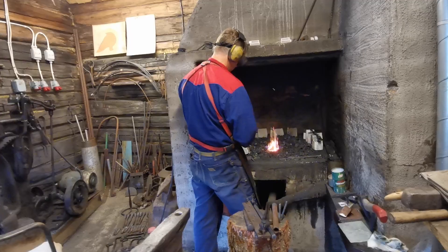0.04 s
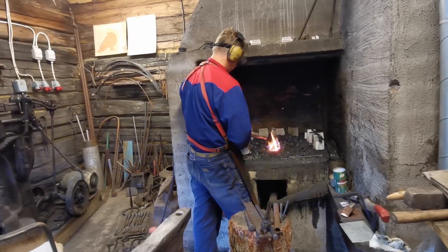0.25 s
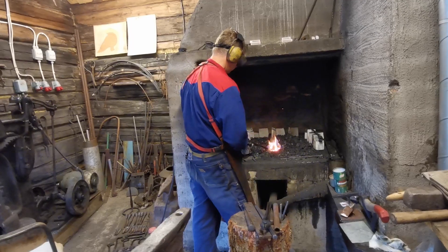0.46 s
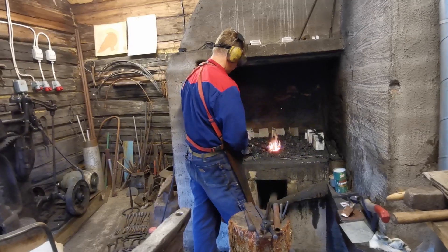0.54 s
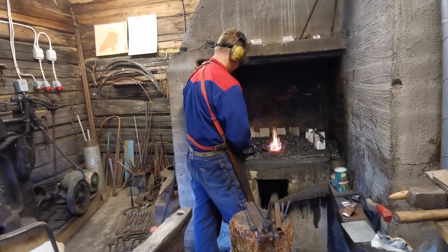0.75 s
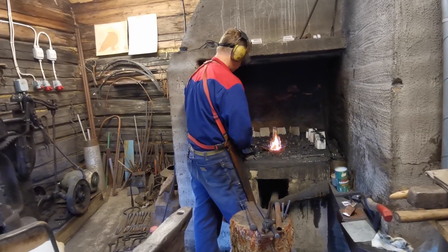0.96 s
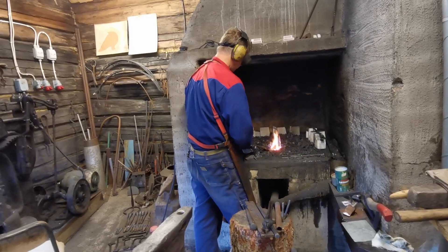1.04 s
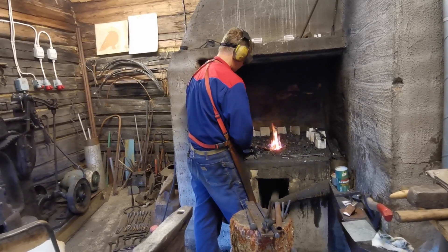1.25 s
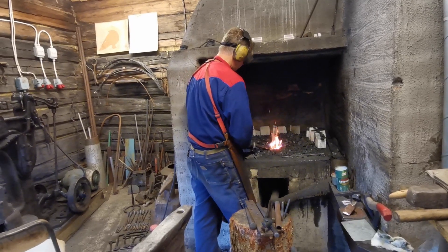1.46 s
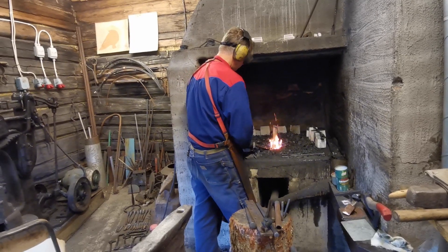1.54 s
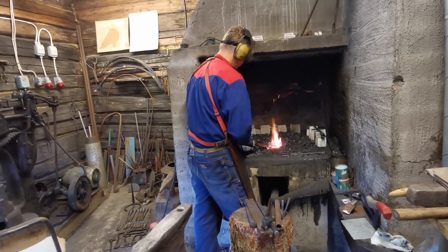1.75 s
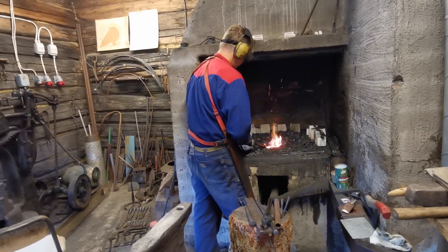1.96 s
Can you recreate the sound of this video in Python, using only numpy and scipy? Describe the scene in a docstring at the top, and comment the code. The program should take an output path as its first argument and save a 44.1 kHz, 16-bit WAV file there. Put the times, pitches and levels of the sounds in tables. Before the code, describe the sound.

An electric blower hums and roars low throughout beside a forge fire; from about 0.75 seconds a rod scrapes and ticks faintly in the coals, in a workshop, heard from a few metres in stereo.

```python
"""A blacksmith's forge, heard from a few metres by a two-port microphone. An electric blower whines on
motor lines, sines that waver slightly. Its air roars as noise through duct, fire pot and hood resonances,
under a broad flickering rush. The smith works an iron rod in the coals: grains of noise and short ticks
ring the rod and coals, over a rustle. Near the end a coal cracks once, a short bright noise burst."""
import sys
import numpy as np
from scipy import signal
from scipy.fft import rfft, irfft
from scipy.io import wavfile
from scipy.ndimage import uniform_filter1d

SR = 44100
rng = np.random.default_rng(int(sys.argv[2]) if len(sys.argv) > 2 else 0)


def natural_amplitude(level_db):
    """Convert a level in decibels to a linear amplitude factor, elementwise."""
    exponent = np.asarray(level_db, float) / 20
    return 10 ** exponent


def dump(signal):
    """Clip the signal to [-1, 1] and save it as 16-bit WAV at the path in sys.argv[1]."""
    limited = np.clip(np.atleast_2d(signal).T, -1, 1)
    pcm = np.round(limited * 32767).astype(np.int16)
    wavfile.write(sys.argv[1], SR, pcm)


N = 88200
T = np.arange(N) / SR
HZ = np.fft.rfftfreq(N, 1 / SR)
SHAFT_HZ = 47.4

# Draught through the fire. Each row: time in seconds, level in dB (only its swing about the mean is used).
DRAUGHT = [(0.0, -47.5), (0.11, -63.5), (0.33, -51.5), (0.38, -61.5), (0.43, -51), (0.67, -59),
           (0.69, -49.5), (0.76, -51), (0.8, -58.5), (1.0, -53), (1.02, -59.5), (1.19, -56.5), (1.25, -45),
           (1.28, -56.5), (1.48, -51.5), (1.53, -57), (1.61, -53), (1.71, -56.5), (1.8, -50), (1.88, -55.5),
           (1.93, -45.5), (2.0, -51.5)]
# Surges of the deepest flue rumble. Each row: time in seconds, level in dB (only its swing is used).
RUMBLE = [(0, -61.5), (.09, -51.5), (.2, -60.5), (.44, -62.5), (.56, -54.5), (.75, -60.5), (1.8, -62),
          (1.92, -53)]


def level(x, db):
    """Scale to an rms level."""
    return x * natural_amplitude(db) / np.sqrt(np.mean(x ** 2))


def table(points, hz):
    """Read (Hz, value) points on a log-frequency axis."""
    p = np.array(points, float)
    return np.interp(np.log(hz + 1e-9), np.log(p[:, 0]), p[:, 1])


def curve(points):
    """Read (s, value) points in time."""
    p = np.array(points, float)
    return np.interp(T, p[:, 0], p[:, 1])


def swing(points):
    """Movement of a dB curve about its mean."""
    db = curve(points)
    return db - db.mean()


def ring(x, hz, width_hz):
    """One resonance, gain 1 at its centre."""
    return signal.lfilter(*signal.iirpeak(hz, hz / width_hz, fs=SR), x)


def walk(rate):
    """Random levels held 1 / rate s and slewed twice; spread near 1."""
    k = int(SR / rate)
    held = np.repeat(rng.standard_normal(N // k + 4), k)
    slewed = uniform_filter1d(uniform_filter1d(held, k), k)
    return 1.3 * slewed[k:k + N]


def ports(x, pan_db, lead):
    """Place a narrow sound on both ports: left-over-right level, and phase by which the right leads."""
    z = signal.hilbert(x)
    left = natural_amplitude(pan_db / 2) * (z * np.exp(-.5j * lead)).real
    right = natural_amplitude(-pan_db / 2) * (z * np.exp(.5j * lead)).real
    return np.array([left, right])


def hum(hz, db, waver_hz, waver_db):
    """A sine that wavers in pitch and level."""
    gain = natural_amplitude(db + waver_db * walk(5.83))
    turns = np.cumsum(hz + waver_hz * walk(2.94)) / SR + rng.random()
    return gain * np.sin(2 * np.pi * turns)


def motor():
    """Slot and other blower tones hold nearly steady; shaft harmonics shake the casing, looser and swelling."""
    # Slot tones: slots times shaft rate plus even multiples of mains.
    # Each row: mains multiple, level in dB, left-over-right pan in dB, right port's phase lead in radians.
    slot_tones = [(0, -65, -10, 0.76), (2, -54.5, -4.5, 1.18), (4, -51.5, 0.5, 1.42)]
    # Pitches of the other steady blower tones. Each entry: frequency in Hz.
    tone_pitches = [555.4, 1263.5, 1392.2, 1553.7]
    # Those tones. Each row: level in dB, left-over-right pan in dB, right port's phase lead in radians.
    other_tones = [(-57, 3, 0.55), (-81, 11, 0.12), (-79.5, -12.5, 1.6), (-80.5, -16.5, 2.6)]
    # Shaft harmonics shaking the casing.
    # Each row: shaft multiple, level in dB, left-over-right pan in dB, right port's phase lead in radians.
    shaft_harmonics = [(1, -62.5, 1, 0.17), (3, -55, 2, 0), (5, -52, 1.5, 0.3)]
    # Swells of the third-harmonic hum. Each row: time in seconds, level in dB (only its swing is used).
    hum_swell = [(0.0, -60.5), (0.03, -54), (0.12, -74), (0.19, -53), (0.6, -66.5), (0.66, -48),
                 (0.72, -64), (0.75, -51.5), (1.14, -62.5), (1.24, -53), (1.46, -57.5), (1.49, -69),
                 (1.84, -48), (2.0, -61.5)]
    rotor_slots, mains_hz = 14, 49.98

    rows = [(rotor_slots * SHAFT_HZ + mains_hz * k, db, pan, lead) for k, db, pan, lead in slot_tones]
    rows += [(hz, *row) for hz, row in zip(tone_pitches, other_tones)]
    out = 0
    for hz, db, pan, lead in rows:
        out = out + ports(hum(hz, db, waver_hz=0.2, waver_db=1.17), pan, lead)
    for k, db, pan, lead in shaft_harmonics:
        # the first surges with the flue, the third has its own swell, the fifth follows the draught
        swell = swing({1: RUMBLE, 3: hum_swell}.get(round(k), DRAUGHT))
        out = out + ports(hum(k * SHAFT_HZ, db + swell, waver_hz=1.5, waver_db=1.2), pan, lead)
    return out


def roar():
    """Turbulent air drives each resonance: draught swells the fire pot, the flue surges below, each flutters."""
    # Resonances of duct, fire pot and hood. Each row: centre in Hz, width in Hz, level in dB,
    # left-over-right pan in dB, right port's phase lead in radians.
    resonances = [(47, 17, -63.5, -0.5, -0.5), (69.1, 8.9, -63.5, 1.5, 0.16), (100.3, 14.4, -60, 0, 0.57),
                  (135.4, 22, -62.5, 3, -0.5), (207.8, 26, -58.5, -2, 0.48),
                  (249.9, 31.3, -58, -1.5, -1.46), (296.8, 13, -65, 1, -0.6), (337, 24.7, -68, -3, 0.58),
                  (408.6, 46, -71.5, -4.5, 0.2), (998.6, 30, -75.5, 15, 1.85), (1039, 14, -72, -4.5, 3.5),
                  (1104, 46, -70.5, -8, 3.5), (2462, 116, -85.5, 1, 0.5)]
    draught_share, flutter_db = .7, 1.
    evenness = .5  # how far each resonance holds its level, 0-1

    swell = draught_share * swing(DRAUGHT)
    surge = swing(RUMBLE)
    out = 0
    for hz, width, db, pan, lead in resonances:
        # two passes, each wider, keep the width; the first N samples let the ring build up
        noise = rng.standard_normal(2 * N)
        tone = ring(ring(noise, hz, 1.56 * width), hz, 1.56 * width)[N:]
        tone = tone / (abs(signal.hilbert(tone)) + 1e-9) ** evenness
        motion_db = flutter_db * walk(5.44)
        if 120 < hz < 500:
            motion_db = motion_db + swell
        if hz < 2 * SHAFT_HZ:
            motion_db = motion_db + surge
        out = out + ports(level(tone, db) * natural_amplitude(motion_db), pan, lead)
    return out


def air():
    """Broad noise rush in overlapping bands that flicker; the ports agree best in the low mids, little above."""
    # Spectrum of the rush. Each row: frequency in Hz, relative density in dB per Hz.
    rush_spectrum = [(20, -30), (40, -5), (230, -8.5), (330, -13.5), (600, -12), (1000, -13), (1200, -16),
                     (1750, -20), (2600, -27), (3200, -29), (5100, -28.5), (5700, -36), (7800, -36),
                     (8500, -42), (10200, -43), (12500, -45), (15700, -48.5)]
    # Likeness of the two ports. Each row: frequency in Hz, likeness from 0 to 1.
    likeness = [(30, 0.7), (60, 0.72), (300, 0.89), (600, 1), (1000, 0.78), (1600, 0.43), (3000, 0),
                (9000, 0.28)]
    flicker_db, port_lead_s = .8, 0.000253  # the right port leads

    a, b = rfft(rng.standard_normal((2, N)))
    alike = np.clip(table(likeness, HZ), 0, .99)
    right = (alike * a + np.sqrt(1 - alike ** 2) * b) * np.exp(2j * np.pi * HZ * port_lead_s)
    pair = np.array([a, right]) * natural_amplitude(table(rush_spectrum, HZ))
    out, common = 0, walk(4.95)
    for centre in np.arange(9, 29) / 2:  # log2 of Hz, half an octave apart
        share = np.clip(1 - 2 * abs(np.log2(HZ + 1e-9) - centre), 0, 1)
        flicker = flicker_db * (0.69 * common + walk(10.62))
        out = out + irfft(pair * share, N) * natural_amplitude(flicker)
    return level(out, -58)


def scrape_force(scrape):
    """Random grains of grit, smeared in power by the room, follow the rubbing of the rod."""
    grit_per_s, grit_spread_db, smear_s, scrape_gain_db = 2000, 2., 0.0031, 1
    grains = (rng.random(N) < grit_per_s / SR) * natural_amplitude(grit_spread_db * rng.exponential(size=N))
    power = signal.lfilter([1], [1, -np.exp(-1 / (smear_s * SR))], grains ** 2)
    fade_in = np.clip((T - scrape[0][0]) / .05, 0, 1)
    return natural_amplitude(scrape_gain_db + curve(scrape)) * fade_in * level(power ** .5, 0)


def rod():
    """Grit and decaying ticks excite the same rings of rod and coals with noise; the coals rustle."""
    # Rod rubbing in the coals. Each row: time in seconds, level in dB ahead of the scrape gain.
    scrape = [(0.72, -101), (0.784, -74), (0.834, -95), (0.98, -73.5), (1.06, -74.5), (1.102, -77),
              (1.194, -81), (1.212, -99), (1.224, -77), (1.302, -97), (1.404, -76.5), (1.48, -78),
              (1.498, -89), (1.62, -79), (1.772, -79.5), (1.926, -71.5), (1.98, -80)]
    # Pitches that rod and coals ring with. Each entry: frequency in Hz.
    ring_pitches = [2900, 5100, 6700, 7460, 8100, 9300, 10780, 12000]
    # Those rings. Each row: width in Hz, gain in dB.
    rings = [(920, 1), (800, 2.5), (400, -2), (300, 3), (200, -5), (400, -5.5), (250, -3.5), (4000, -3)]
    # Ticks of the rod. Each row: start in seconds, driving level in dB at 7500 Hz,
    # left-over-right pan in dB, brightness in dB per octave.
    ticks = [(.787, -79.5, 0, -2), (.957, -80, -10, -8), (1.02, -78, -5, -4), (1.132, -74, -2, 1),
             (1.183, -75.5, -6, -3), (1.221, -66.5, -2, -5.5), (1.378, -77, -2, 6), (1.394, -80, -4, 4),
             (1.404, -80, -5, -8), (1.445, -77, -2, -5), (1.605, -76, 0, -9), (1.72, -78, -6, -5),
             (1.857, -75, 2, -6)]
    # Broad rustle of shifting coals. Each row: frequency in Hz, relative level in dB.
    rustle_spectrum = [(1200, -19), (2500, -7.5), (5000, -6), (8000, -7), (12000, -13), (15600, -15)]
    rustle_db, rub_ring_db, scrape_pan_db = -1.5, -15, -6
    tick_t60_s, ring_turns = .06, 40  # a tick's force lasts this tail plus turns / width

    rubbing = scrape_force(scrape)
    sides = np.array([[.5], [-.5]])
    noise = rng.standard_normal((2, N))
    rustle = irfft(rfft(rng.standard_normal((2, N))) * natural_amplitude(table(rustle_spectrum, HZ)), N)
    out = rubbing * level(rustle, rustle_db)
    for hz, (width, ring_db) in zip(ring_pitches, rings):
        force = rubbing * natural_amplitude(rub_ring_db + scrape_pan_db * sides)
        t60 = tick_t60_s + ring_turns / width
        for s, db, pan, bright_db in ticks:
            tail = (T >= s) * np.exp(-np.log(1000) * np.clip(T - s, 0, None) / t60)
            force = force + natural_amplitude(db + bright_db * np.log2(hz / 7500) + pan * sides) * tail
        ringing = ring(ring(force * noise, hz, 1.8 * width), hz, 1.8 * width)
        # narrow rings pass less noise, so they are raised
        out = out + natural_amplitude(ring_db) * np.sqrt(SR / width / 8) * ringing
    return out


def crack():
    """A coal cracks once: a very short noise burst in one thin, bright band, alike at both ports."""
    start_s, decay_s, drive_db = 1.932, .002, -61
    centre_hz, width_hz = 11800, 3500
    decay = (T >= start_s) * np.exp(-np.clip(T - start_s, 0, None) / decay_s)
    burst = decay * rng.standard_normal(N)
    return natural_amplitude(drive_db) * ring(ring(burst, centre_hz, width_hz), centre_hz, width_hz)


def scene():
    """Blower, fire and rod together."""
    return motor() + roar() + air() + rod() + crack()


def roll_off(x):
    """The treble ends steeply here."""
    return signal.sosfilt(signal.butter(12, 15600, fs=SR, output="sos"), x)


def record(dry):
    """The two ports differ in level, most in the treble, and drop the lowest bass."""
    # Level difference of the ports. Each row: frequency in Hz, left-over-right level in dB.
    port_balance = [(60, -0.5), (400, 0.5), (1300, 0.5), (2400, -1.5), (4400, -1), (7500, -6), (9500, 6),
                    (12000, 3), (15000, -0.5)]
    balance = natural_amplitude(table(port_balance, HZ) * np.array([[.5], [-.5]]))
    x = irfft(rfft(dry) * balance, N)
    low_cut = signal.butter(2, 17.4, "high", fs=SR, output="sos")
    mix = signal.sosfilt(low_cut, x)
    return roll_off(mix)


dry = scene()
out = record(dry)
dump(out)
```